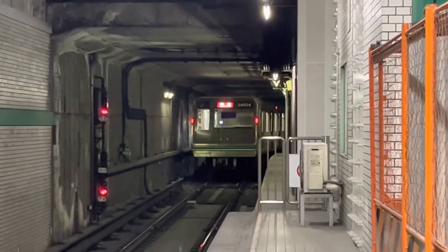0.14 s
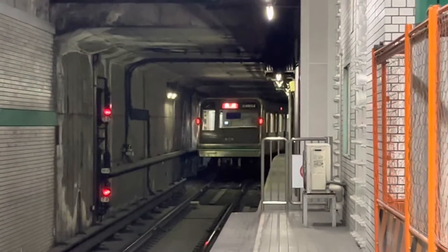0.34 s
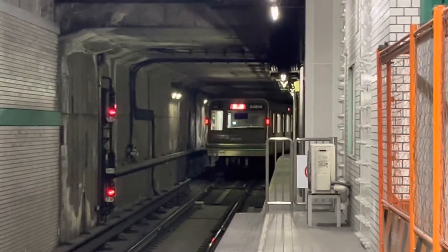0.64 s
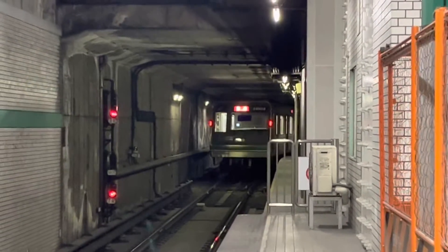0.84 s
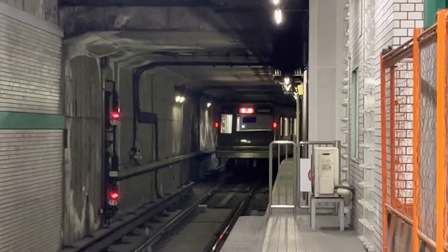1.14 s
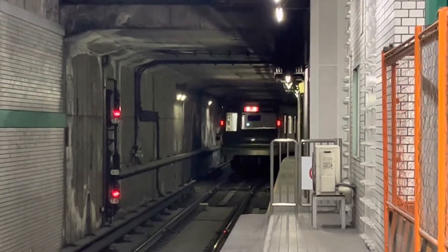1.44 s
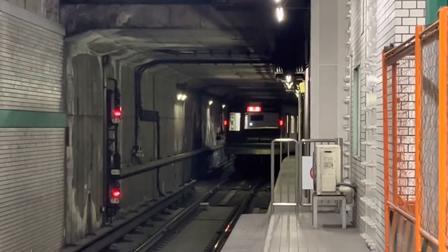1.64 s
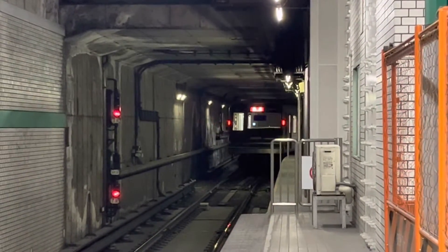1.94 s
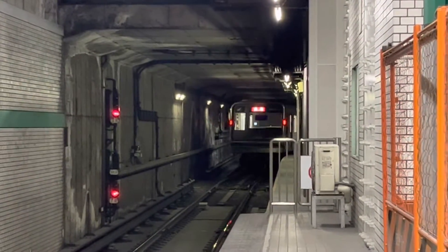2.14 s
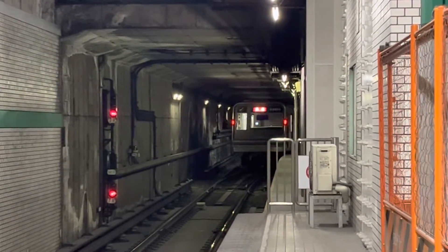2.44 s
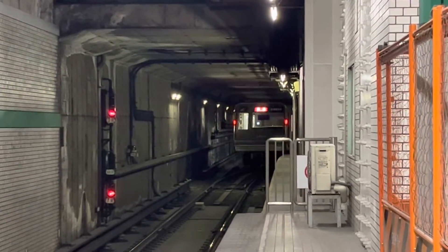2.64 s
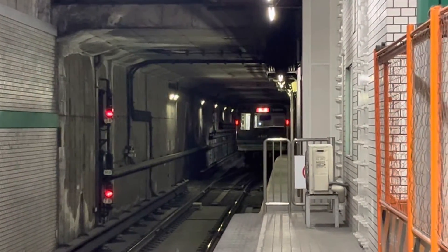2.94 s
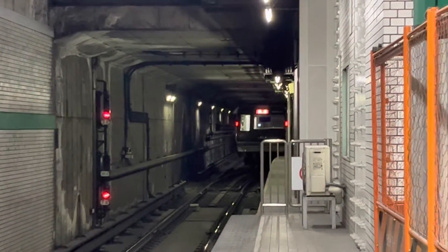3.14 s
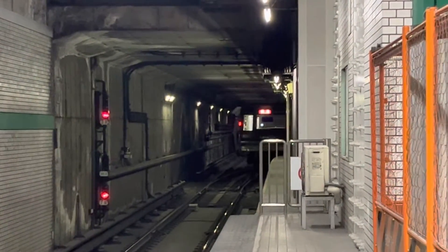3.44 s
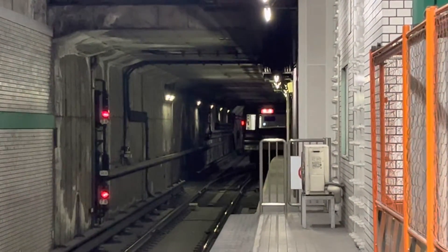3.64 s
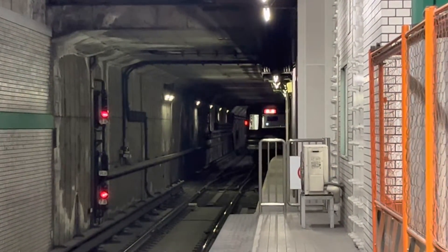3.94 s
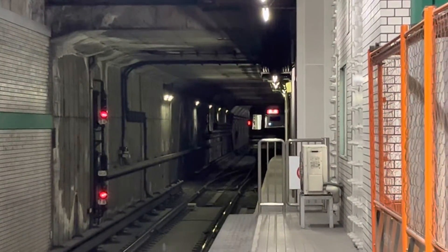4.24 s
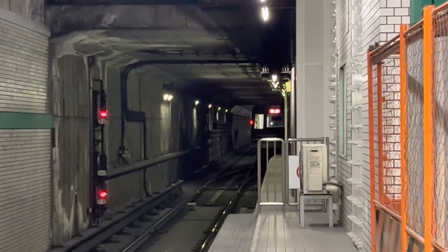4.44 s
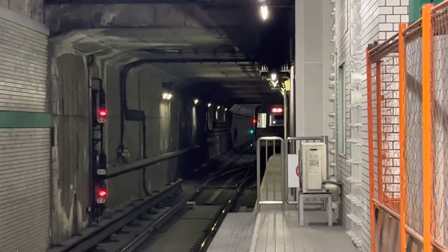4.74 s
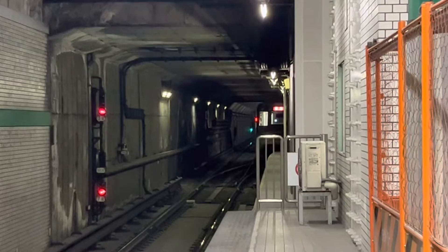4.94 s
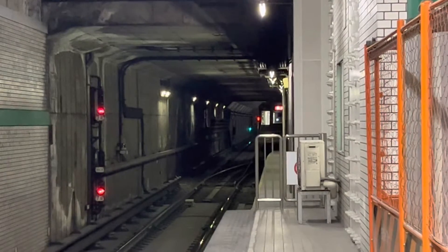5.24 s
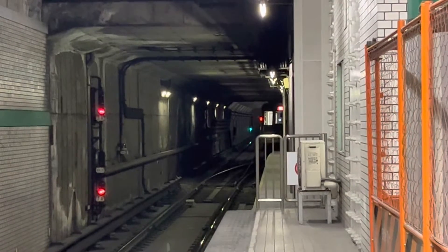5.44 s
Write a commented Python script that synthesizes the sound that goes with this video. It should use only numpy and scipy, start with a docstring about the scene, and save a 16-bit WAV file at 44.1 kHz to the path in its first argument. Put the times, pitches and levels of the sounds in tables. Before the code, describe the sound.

A subway train rolls away into a concrete tunnel, its wheels rumbling, rail joints clanking sharply at first, then thudding dully with distance.

```python
"""Wheels rumble and blows clank and thud at rail joints as a subway train rolls away from the platform end
into a concrete tunnel. A gear hums, the rail sings and flanges squeal faintly.
Rolling and smeared blows are third-octave noise; clanks, singing and squeals are noise in narrow resonances;
hum and thumps are sines. A small microphone pair listens from the platform."""
import sys
import numpy as np
from scipy import signal
from scipy.fft import rfft, irfft, next_fast_len
from scipy.io import wavfile

SR = 44100
rng = np.random.default_rng(int(sys.argv[2]) if len(sys.argv) > 2 else 0)


def int16_out(signal):
    """Quantize to a 16-bit WAV file."""
    q = np.round(np.clip(np.atleast_2d(signal).T, -1, 1) * 32767)
    wavfile.write(sys.argv[1], SR, q.astype(np.int16))


N = 246939   # samples


def from_db(db):
    """Amplitude gain of a level; a doubled level gives power."""
    return 10 ** (np.asarray(db) / 20)


def rms_one(x):
    """Scale to rms 1."""
    return x / np.sqrt(np.mean(x ** 2) + 1e-20)


def seconds():
    """Time of every sample [s]."""
    return np.arange(N) / SR


def level_in_time(rows):
    """(time [s], level [dB]) rows interpolated at every sample."""
    return np.interp(seconds(), *np.transpose(rows))


def at_hz(points, hz):
    """Two-column table read on a log-frequency axis."""
    table_hz, values = np.transpose(points)
    return np.interp(np.log(hz), np.log(np.maximum(table_hz, 1)), values)


def between(levels, anchors_hz, hz):
    """Log-frequency blend of the two levels whose anchors enclose hz."""
    place = np.interp(np.log(hz), np.log(anchors_hz), np.arange(len(anchors_hz)))
    k = min(int(place), len(anchors_hz) - 2)
    return levels[k] + (place - k) * (levels[k + 1] - levels[k])


def drift(rate_hz):
    """Slow random curve of rms 1: noise at SR / 40 through two equal low-pass poles at rate_hz."""
    r = np.exp(-80 * np.pi * rate_hz / SR)
    noise = rng.standard_normal(N // 40 + 2002)
    slow = signal.lfilter([1], [1, -2 * r, r * r], noise)[2000:]   # drop the settling
    return np.interp(np.arange(N) / 40, np.arange(len(slow)), rms_one(slow))


def resonance(x, hz, width_hz):
    """Two-pole peak, gain about 1 on top."""
    r = np.exp(-np.pi * width_hz / SR)
    numerator = (1 - r * r) / 2 * np.array([1, 0, -1])
    return signal.lfilter(numerator, [1, -2 * r * np.cos(2 * np.pi * hz / SR), r * r], x)


def narrow_noise(hz, width_hz):
    """Two unrelated noises through a resonance with steepened flanks; rms 1."""
    noise = rng.standard_normal((2, N))
    return rms_one(resonance(resonance(noise, hz, width_hz), hz, 4 * width_hz))


# singing of the rail under the wheels: (time [s], level before the mode offset [dB])
SING_LEVEL = [(0, -51.5), (.9, -51.5), (2.3, -50), (3.4, -53.5), (4.15, -54.5), (4.35, -53.5), (4.7, -55),
              (5.6, -59.5)]
# singing resonances of the rail: (frequency [Hz], width [Hz], offset [dB])
SING_MODES = [(2785, 38, -4.5), (2880, 160, -5), (3240, 80, -9)]


def rail_singing(flutter_db):
    """Rolling noise in a few narrow rail resonances that come and go."""
    level_db, out = level_in_time(SING_LEVEL), 0
    for hz, width_hz, mode_db in SING_MODES:
        gain = from_db(level_db + mode_db + flutter_db * drift(9.3))
        out = out + gain * narrow_noise(hz, width_hz)
    return out


# flange squeals: (start [s], length [s], fade time constant [s], frequency [Hz], width [Hz],
#                  level before flutter [dB])
SQUEALS = [(1.56, 0.2, .16, 4350, 140, -47.5), (1.58, .2, .2, 5300, 150, -57),
           (1.52, 0.3, .12, 3720, 90, -54), (2.475, 0.04, .14, 3900, 80, -50),
           (2.19, .1, .15, 5500, 200, -60), (4.47, 0.08, .15, 4320, 150, -59),
           (4.925, 0.06, .03, 3700, 45, -58), (4.42, .14, .1, 3640, 45, -62),
           (4.88, .1, .08, 4400, 250, -64)]


def squeals(rise_s, flutter_db):
    """Noise in a narrow resonance sets in quickly, holds brokenly, then fades exponentially."""
    t, out = seconds(), 0
    for start_s, length_s, fade_s, hz, width_hz, level_db in SQUEALS:
        rise = np.clip((t - start_s) / rise_s, 0, 1)
        fade = np.exp(-np.maximum(t - start_s - length_s, 0) / fade_s)
        gain = from_db(level_db + flutter_db * drift(10.0))
        out = out + gain * rise * fade * narrow_noise(hz, width_hz)
    return out


# gear hum: (time [s], level before flutter [dB])
HUM_LEVEL = [(0.0, -38), (0.11, -35), (0.32, -38), (0.34, -48.5), (0.53, -35), (0.55, -49), (0.73, -36.5),
             (0.78, -46), (0.91, -25.5), (1.01, -35), (1.04, -20), (1.11, -31), (1.15, -32.5), (1.27, -46),
             (1.32, -31.5), (1.36, -38.5), (1.41, -27), (1.49, -26), (1.54, -42), (1.57, -31), (1.64, -45),
             (1.74, -33), (1.91, -49), (2.08, -39), (2.24, -45), (2.27, -42), (2.31, -62), (2.5, -33.5),
             (2.55, -34.5), (2.6, -28), (2.67, -34.5), (2.71, -36.5), (2.78, -45), (2.84, -34.5),
             (3.07, -56), (3.09, -45.5), (3.5, -47)]
HUM_MEAN_HZ = 455


def gear_hum(waver_hz, flutter_db, octave_db, octave_fade_db_per_s):
    """Near sine of wavering pitch and level; its weak octave is lost with distance."""
    level_db = level_in_time(HUM_LEVEL + [(3.7, -72)]) + flutter_db * drift(17.0)
    phase = 2 * np.pi * np.cumsum(HUM_MEAN_HZ + waver_hz * drift(21.8)) / SR
    phases = np.array([phase, phase + 3 * drift(3.2)])   # shared and diffuse field
    octave_gain = from_db(octave_db - octave_fade_db_per_s * np.maximum(seconds() - 1.5, 0))
    tone = np.sin(phases) + octave_gain * np.sin(2 * phases)
    return np.sqrt(2) * from_db(level_db) * tone   # sqrt(2): levels are rms


# single low pushes of a wheel: (time [s], peak level [dB], frequency [Hz])
THUMPS = [(0.661, -22, 110), (0.705, -8, 120), (1.142, -18, 108), (1.615, -11.5, 134), (2.606, -17.5, 53.4),
          (2.801, -15, 88), (3.081, -22.5, 91.5), (3.175, -8, 155), (3.229, -17, 182), (3.5, -10.5, 75.6),
          (3.53, -16.5, 140), (3.62, -18, 110), (3.678, -14, 86.5), (3.803, -17, 55.7), (3.883, -15, 120),
          (3.994, -15, 88), (4.178, -18, 80), (4.449, -15.5, 61)]


def thumps(cycles):
    """A soft push swells for `cycles` of its own pitch and dies within a few; shared field only."""
    out = np.zeros((2, N))
    for start_s, peak_db, hz in THUMPS:
        turns = np.arange(int(12 * cycles * SR / hz)) * hz / SR
        envelope = turns / cycles * np.exp(1 - turns / cycles)
        push = from_db(peak_db) * np.sin(2 * np.pi * turns) * envelope
        at = int(start_s * SR)
        out[0, at:at + len(push)] += push[:N - at]
    return out


# blows at rail joints, with double hits, rebounds and ringing onsets: (time [s], rail clank [dB],
#   burst thud [dB], burst ring [dB], mean dullness above the ring [dB/octave], burst t60 [s],
#   extra ring of the lowest resonances [dB], of the high resonances [dB], of the upper clank [dB])
BLOWS = [(0.927, -17.5, -31.5, -29, 5.5, 0.32, 8, 4.5, -3),
         (0.942, -8.5, -17, -36.5, -1, 0.23, -9, 0, -6.5), (1.068, -33.5, -32, -44, 6, 0.34, -8, 3, 5.5),
         (1.103, -39, -20, -43.5, 5.5, 0.45, 7, 0, 6), (1.323, -33, -39, -38.5, 16, 0.083, 13, 4.5, -1),
         (1.43, -22.5, -34, -33, 7, 0.17, -7, -2.5, 0), (1.438, -21.5, -28.5, -33, 8.5, 0.37, 1, 7, 1.5),
         (1.5673, -35, -31, -31.5, 22, 0.92, 3, -5.5, 4), (1.811, -18, -28, -39.5, 9, 0.2, -9, -3.5, -7.5),
         (2.058, -54, -40, -49, 9, 0.1, 3, -6, -2), (2.216, -43, -20, -39.5, 20, 0.46, -4, -4, -1),
         (2.3027, -17, -27, -38.5, 34, 0.29, -17.5, 5, -4), (2.325, -35.5, -42, -53, 27, 0.4, -12, -2, 11),
         (2.725, -42, -19.5, -43, 18.5, 0.51, -2, -12, 2), (3.048, -48, -17, -40.5, 13, 0.55, 10, -3, -0.5),
         (3.1665, -54, -20, -45, 27, 0.63, -3.5, -1, 1.5),
         (3.478, -46, -14.5, -38.5, 8.5, 0.73, 3, -3, 9.5),
         (3.6194, -43, -31, -56.5, 9, 0.17, 1, 12.5, -3.5), (3.798, -53, -47, -41.5, 16, 0.75, -2, -7, 2),
         (4.3326, -48, -39, -46, 15.5, 1, 1, -2.5, 4), (4.904, -46, -33, -48, 13, 0.31, -5, -4.5, 1)]
# anchors of the burst spectrum, thud, knock, ring, crack, tick: (frequency [Hz])
BURST_HZ = [270, 750, 2800, 5500, 11000]
KNOCK_SHARE, KNOCK_DB = 0.38, -4   # knock lies between thud and ring
CRACK_SHARE = 0.42   # first octave above the ring loses less than the second


def blow_levels(hz):
    """Level [dB] of every blow's noise burst at one pitch."""
    thud, ring, dullness = np.transpose(BLOWS)[2:5]
    knock = thud + KNOCK_SHARE * (ring - thud) + KNOCK_DB
    crack, tick = ring - CRACK_SHARE * dullness, ring - 2 * dullness
    return between([thud, knock, ring, crack, tick], BURST_HZ, hz)


# reverberation of the tunnel: (frequency [Hz], t60 [s])
TUNNEL_T60 = [(60, 1.7), (500, 1.14), (1500, 1.57), (5000, 0.92), (12000, 0.18)]
BUILD_UP = 0.028   # pile-up time constant as a share of the burst t60
BASS_LAG_CYCLES = 1.5   # added to it: low pitches pile up later
STEP = 32   # samples between envelope points


def echo_power(blow_db, hz, tail_db):
    """Blow power near hz: echoes pile up, then a burst and a tunnel tail each decay at their own rate."""
    start_s, burst_t60_s = np.array(BLOWS)[:, [0]], np.array(BLOWS)[:, [5]]
    since_s = np.maximum(np.arange(0, N + STEP, STEP) / SR - start_s, 0)
    pile_up_s = BUILD_UP * burst_t60_s + BASS_LAG_CYCLES / hz
    pile_up = (1 - np.exp(-since_s / pile_up_s)) ** 2
    burst = from_db(-120 * since_s / burst_t60_s)   # power: -60 dB at t60
    tail = from_db(2 * tail_db - 120 * since_s / at_hz(TUNNEL_T60, hz))
    power = from_db(2 * blow_db) @ (pile_up * (burst + tail))
    return np.interp(np.arange(N) / STEP, np.arange(since_s.shape[1]), power)


# resonances of rail and wheel: (frequency [Hz], width [Hz],
#   level re clank or, above CLANK_TOP_HZ, re burst [dB], tunnel tail re burst decay [dB])
RAIL = [(899, 18, -21, -6), (1021, 24, -25, -4), (1421, 70, -8, -17), (1528, 80, -7, -18),
        (1660, 79, -22, 3.5), (1869, 24, -20, -5), (1870, 70, -23, -14.5), (1936, 110, -21.5, -3.5),
        (2155, 49, -22, -10.5), (2346, 30, -8.5, -10.5), (2537, 51, -14, -5.5), (2830, 19, -8, -15),
        (2990, 64, -16.5, 0), (3224, 56, -18.5, -2.5), (3430, 38, -13, -13.5), (3585, 43, -21, -6),
        (3630, 120, -21.5, -3), (4250, 43, -29, -11), (4970, 160, -11.5, -14.5), (5320, 280, -12.5, -12.5),
        (6120, 650, -6, -21.5)]
CLANK_LOW_HZ, CLANK_MID_HZ, CLANK_TOP_HZ = 1200, 1600, 2200   # lowest < LOW; upper clank MID to TOP


def rail_ringing(rattle_db):
    """Every blow excites the same resonances, each with a random strength; loose parts make them rattle."""
    blows, out = np.transpose(BLOWS), 0
    clank_db, low_db, high_db, upper_db = blows[[1, 6, 7, 8]]
    spread_db = rng.normal(0, 2.0, (len(BLOWS), len(RAIL)))
    for k, (hz, width_hz, level_db, tail_db) in enumerate(RAIL):
        # high resonances need a sharp blow
        drive_db = clank_db if hz < CLANK_TOP_HZ else blow_levels(hz) + high_db
        if hz < CLANK_LOW_HZ:
            drive_db = drive_db + low_db
        if CLANK_MID_HZ < hz < CLANK_TOP_HZ:
            drive_db = drive_db + upper_db
        power = echo_power(drive_db + level_db + spread_db[:, k], hz, tail_db)
        out = out + narrow_noise(hz, width_hz) * np.sqrt(power)
    return out * from_db(rattle_db * drift(30.0))


# rolling as the train recedes: (frequency [Hz], start level before swell and colour [dB], fade [dB/s])
ROLL_FADE = [(80, -29.5, .5), (316, -28, 1.5), (2397, -45.5, 0.16), (10860, -84.5, 1.5)]
# swell around that fade: (time [s], offset [dB])
ROLL_SWELL = [(0, 1), (.45, 0), (.55, 2), (.75, 2.5), (.87, 0.5), (1.3, -1.5), (2.0, -1), (2.9, -0.5),
              (3.7, 2), (4.3, -0.5), (5.6, -0.5)]
NEAR_AIR_DB = 23.5   # extra from 11 kHz up until the last car is inside
NEAR_AIR_END_S, NEAR_AIR_FADE_S = .52, .12


def rolling_db(hz):
    """Rolling level near hz: steady fade with distance, swell common to all pitches, extra air at first."""
    anchor_hz, start_db, fade_db_per_s = np.transpose(ROLL_FADE)
    t = seconds()
    near = .5 - .5 * np.tanh((t - NEAR_AIR_END_S) / NEAR_AIR_FADE_S)
    air_db = between([0, NEAR_AIR_DB], [5000, 11000], hz) * near
    faded_db = between(start_db, anchor_hz, hz) - between(fade_db_per_s, anchor_hz, hz) * t
    return faded_db + level_in_time(ROLL_SWELL) + air_db


# colour of the rolling noise around those levels: (frequency [Hz], offset [dB])
ROLL_COLOUR = [(25, -2.5), (40, -6), (63, -2), (110, -8.5), (200, -7.5), (350, -8), (600, -8),
               (1000, -10.5), (1500, -6), (2800, -10), (4000, 0.5), (5500, 5), (8000, -0.5), (11000, -15),
               (14500, -16)]
BAND_EDGES_HZ = 22 * 2 ** (np.arange(30) / 3)
TAIL_DB = -5.5   # tunnel tail re first burst of echoes


def wheels(patchy_db):
    """Third-octave noise bands carry the steady rolling and the smeared blows together."""
    white, together, out = rng.standard_normal((2, 2, N)), drift(2.4), 0
    for k, (low_hz, high_hz) in enumerate(zip(BAND_EDGES_HZ, BAND_EDGES_HZ[1:])):
        hz = np.sqrt(low_hz * high_hz)
        band_filter = signal.butter(2, [low_hz, high_hz], "band", fs=SR, output="sos")
        band = signal.sosfilt(band_filter, white[k % 2])   # neighbours use unrelated noise
        patches_db = patchy_db * (0.18 * together + drift(5.1))
        steady_db = rolling_db(hz) + at_hz(ROLL_COLOUR, hz) + patches_db
        bass_db = -4.5 * max(np.log2(210 / hz), 0)   # blows carry little deep bass
        burst_db = blow_levels(hz) - 9.0 + bass_db   # a band holds a share of the burst
        power = from_db(2 * steady_db) + echo_power(burst_db, hz, TAIL_DB)
        out = out + np.sqrt(power) * rms_one(band)
    return out


def scene():
    """Two fields at the platform: one shared by both microphone ports, one unrelated and diffuse."""
    tones = rail_singing(flutter_db=2.2) + squeals(rise_s=0.015, flutter_db=2.5)
    tones = tones + gear_hum(waver_hz=4.38, flutter_db=2.3, octave_db=-24.5, octave_fade_db_per_s=3.5)
    blows = thumps(cycles=0.24) + rail_ringing(rattle_db=1.0)
    return tones + blows + wheels(patchy_db=1.05)


# likeness of the sound at the two ports: (frequency [Hz], likeness [0-1])
LIKENESS = [(60, .99), (300, .94), (600, .8), (1000, .65), (1250, .2), (1450, .93), (1580, .9), (1680, .55),
            (2100, .95), (3300, .95), (3600, 1), (5000, 1), (5400, .87), (7400, .8), (7900, 1), (9100, 1),
            (10000, .6), (11000, 1), (13000, 1), (13600, .7), (14500, 1)]
# phase lead of the left port: (frequency [Hz], lead [rad])
PORT_PHASE = [(0, 0), (950, .3), (1210, -.2), (1330, -2.7), (1570, -2.9), (1650, -3.5), (1810, -6.1),
              (3300, -6.1), (3600, -2 * np.pi), (5080, -2 * np.pi), (5770, -7.2), (6800, -7.2),
              (7900, -3 * np.pi), (9000, -3 * np.pi), (11000, -4 * np.pi), (13000, -4 * np.pi),
              (14500, -5 * np.pi)]
# balance of the ports: (frequency [Hz], left over right [dB])
PORT_BALANCE = [(100, .5), (700, 2), (1150, 1), (1500, -9), (1900, -7), (2300, -2), (3300, 0)]
LOW_CUT_HZ, HIGH_CUT_HZ = 57, 14580


def record(dry):
    """Ports differ in likeness, level and phase by pitch; deep bass and the top are cut."""
    size = next_fast_len(N + 4096)
    hz = np.maximum(np.arange(size // 2 + 1) * SR / size, 1)
    shared, diffuse = rfft(dry, size)
    alike = at_hz(LIKENESS, hz)
    shared = np.sqrt((1 + alike) / 2) * shared
    diffuse = np.sqrt((1 - alike) / 2) * diffuse
    lean = from_db(at_hz(PORT_BALANCE, hz) / 2)
    lead = np.exp(1j * np.interp(hz, *np.transpose(PORT_PHASE)))
    left, right = (shared + diffuse) * lean * lead, (shared - diffuse) / lean
    ports = irfft([left, right], size)[:, :N]
    low_cut = signal.butter(3, LOW_CUT_HZ, "high", fs=SR, output="sos")
    high_cut = signal.ellip(10, .5, 60, HIGH_CUT_HZ, fs=SR, output="sos")   # ripple, stopband [dB]
    return signal.sosfilt(high_cut, signal.sosfilt(low_cut, ports))


dry = scene()
out = record(dry)
int16_out(out)
```